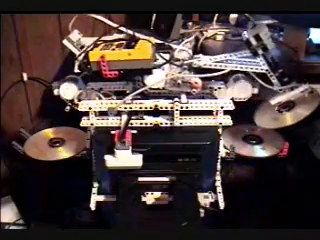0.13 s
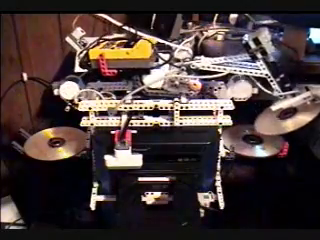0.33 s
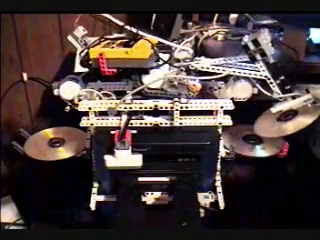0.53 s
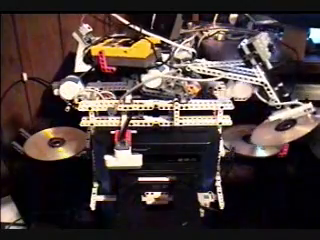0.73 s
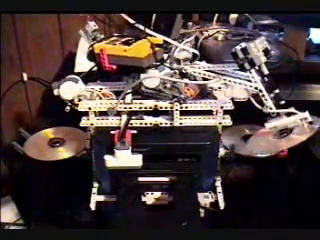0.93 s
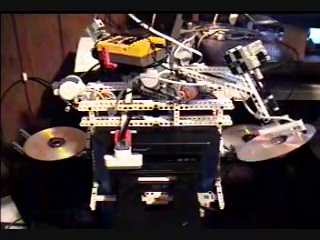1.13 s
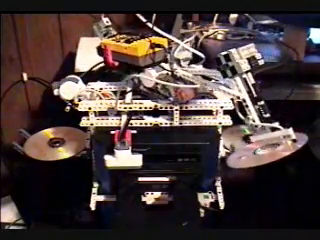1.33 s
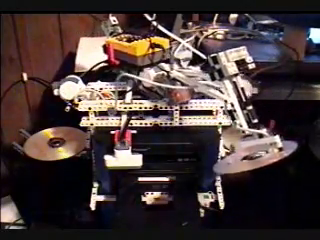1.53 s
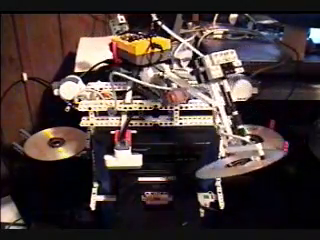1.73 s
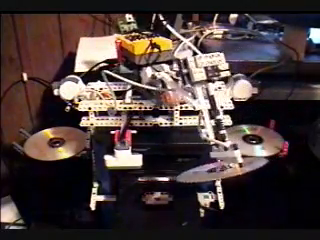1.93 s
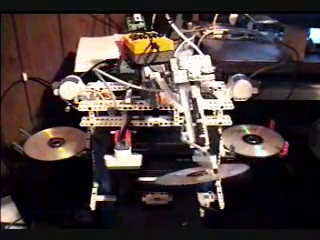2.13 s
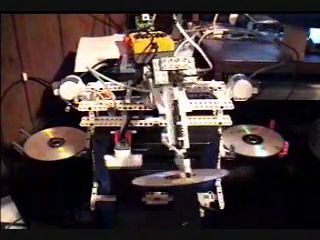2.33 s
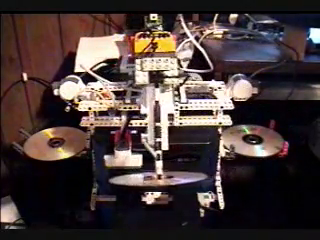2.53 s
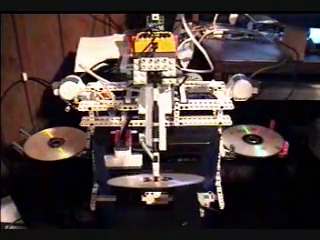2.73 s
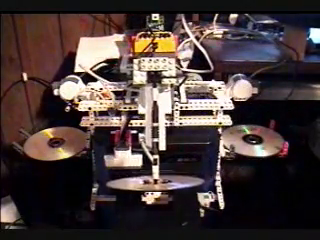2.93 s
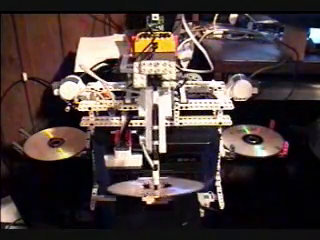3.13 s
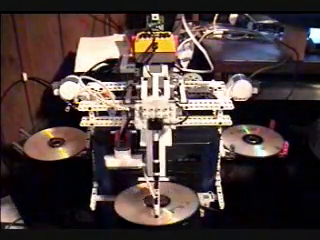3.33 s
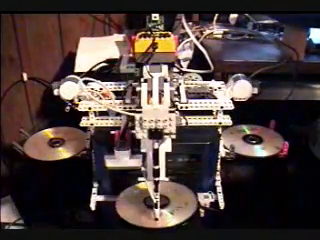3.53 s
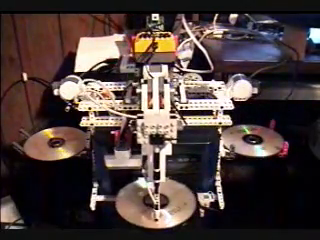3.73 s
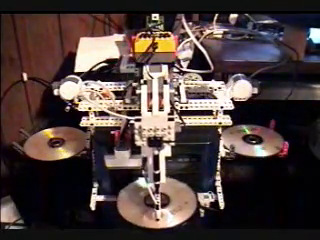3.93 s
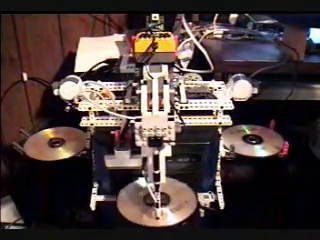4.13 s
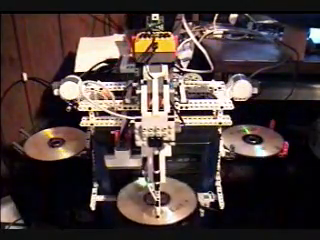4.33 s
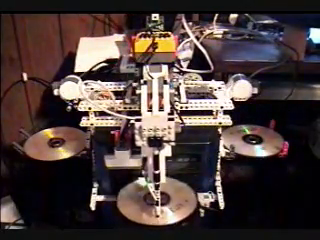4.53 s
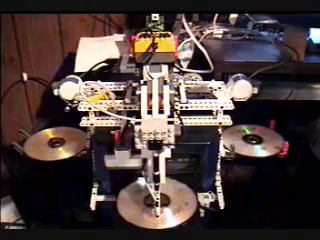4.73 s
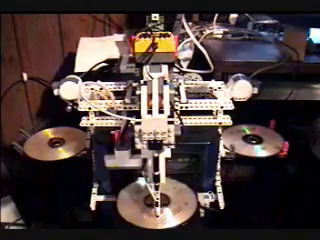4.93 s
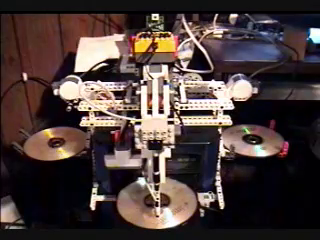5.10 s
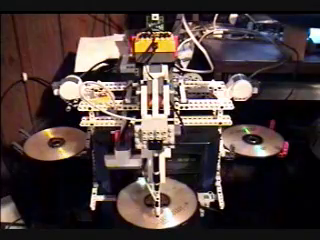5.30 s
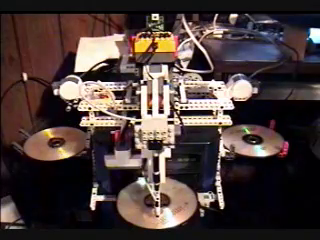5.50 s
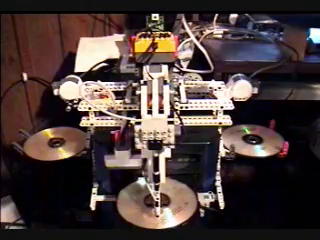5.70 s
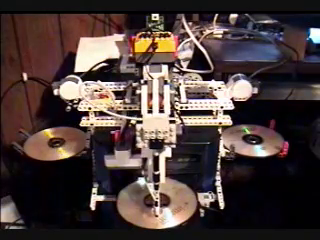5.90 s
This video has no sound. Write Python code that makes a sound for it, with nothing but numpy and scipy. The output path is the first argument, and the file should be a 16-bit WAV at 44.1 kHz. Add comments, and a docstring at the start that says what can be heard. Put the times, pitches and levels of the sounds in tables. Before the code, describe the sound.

A small geared motor whines and rattles for over two seconds, plastic clacks follow, then a second motor labours in three sagging turns over fan hum.

```python
"""Fans hum throughout: coloured noise plus unsteady tones. A home-built robot of plastic bricks carries a disc.
A geared motor swings the arm in one long whine: multiples of the shaft speed over a tooth rattle, then a coast-down.
The arm settles with small rattles, tips down through its resonances and clacks twice in decaying noise.
A second motor labours through three sagging turns; a few faint nudges follow.
The sound feeds the right channel, whose peaks may clip; the left has faint crosstalk and hiss."""
import sys
import numpy as np
from scipy import signal
from scipy.fft import rfft, irfft, next_fast_len
from scipy.io import wavfile
from scipy.ndimage import uniform_filter1d, map_coordinates

SR = 44100
rng = np.random.default_rng(int(sys.argv[2]) if len(sys.argv) > 2 else 0)


def master_out(mix):
    """Clip the mix to full scale and print it as 16-bit PCM to the path in sys.argv[1]."""
    frames = np.transpose(np.atleast_2d(mix))
    ceiling = np.clip(frames, -1, 1)
    pcm = np.round(ceiling * 32767).astype(np.int16)
    wavfile.write(sys.argv[1], SR, pcm)


N = 267246


def amp(db):
    """Decibels to gain."""
    return 10 ** (np.asarray(db) / 20)


def unit(x):
    """Scale to rms 1."""
    return x / np.sqrt(np.mean(x ** 2) + 1e-20)


def clock():
    """Seconds at each sample."""
    return np.arange(N) / SR


def along(points, hz):
    """Read (Hz, value) points on a log axis."""
    f, v = np.transpose(points)
    return np.interp(np.log(hz + 1), np.log(f + 1), v)


def curves(rows):
    """One value per sample for each column after the time."""
    s, *cols = np.transpose(rows)
    return [np.interp(clock(), s, c) for c in cols]


def wobble(rate):
    """A smooth random curve, rate knots a second."""
    knots = rng.standard_normal(int(N * rate / SR) + 4)
    return map_coordinates(knots, [clock() * rate], order=2)


def filtered(x, response):
    """x times a response of frequency."""
    m = next_fast_len(N + 8192)
    return irfft(rfft(x, m) * response(np.fft.rfftfreq(m, 1 / SR)), m)[..., :N]


def coloured(x, spectrum):
    """Shape x by (Hz, dB) points, falling away below the first; rms 1."""
    lowest_hz = spectrum[0][0]
    return unit(filtered(x, lambda hz: amp(along(spectrum, hz)) * np.minimum(hz / lowest_hz, 1) ** 2))


def angle(hz):
    """Running phase of a rate."""
    return 2 * np.pi * np.cumsum(hz * np.ones(N)) / SR


def fades(start, end, rise_db, fall_db):
    """Level in dB: 0 from start to end, with a rise before and a fall after, both in dB a second."""
    return -rise_db * np.maximum(start - clock(), 0) - fall_db * np.maximum(clock() - end, 0)


def bell(centre_s, sigma_s):
    """Gaussian pulse in time, peak 1."""
    return np.exp(-.5 * ((clock() - centre_s) / sigma_s) ** 2)


def lagging(x, lag_s):
    """x followed with a short delay, as by a mass."""
    keep = np.exp(-1 / (lag_s * SR))
    return x[0] + signal.lfilter([1 - keep], [1, -keep], x - x[0])


def ringing(resonances, hz):
    """Lift in dB of a tone that glides through (Hz, width Hz, dB) resonances."""
    return sum(lift / (1 + (2 * (hz - centre) / width) ** 2) for centre, width, lift in resonances)


def rattle(tooth_hz, spectrum, bite, uneven_db):
    """Noise pulsing at the tooth rate, of randomly varying strength, coloured by the plastic; rms 1."""
    strikes = np.exp(bite * np.cos(angle(tooth_hz))) * amp(uneven_db * wobble(450))
    return coloured(strikes * rng.standard_normal(N), spectrum)


def room(x, t60=0.22):
    """The short answer of a small furnished room: a decaying noise tail."""
    age = np.arange(SR // 3) / SR
    tail = rng.standard_normal(len(age)) * amp(-60 * age / t60) * (age > .003)
    return signal.fftconvolve(x, tail / np.linalg.norm(tail))[:N]


def fans():
    """Rushing air with slightly unsteady blade and mains tones."""
    # spectra of the rush and the low drone: pitch_hz, relative_db
    air_spectrum = [(180, -61), (300, -18.5), (344, -2.5), (379, -10), (459, -3.5), (712, -4.5),
                    (990, -8.5), (1070, -8.5), (2420, -15), (2970, -17), (4240, -18.5), (6400, -23.5),
                    (7970, -38.5), (10400, -71), (17500, -120)]
    bass_spectrum = [(25, -27), (80, -29.5), (120, -27), (170, -18), (210, -6.5), (245, 5), (300, -2),
                     (400, -39), (600, -76.5)]
    # blade and mains tones: pitch_hz, relative_db
    hum_tones = [(118.4, -68), (145.3, -69.5), (242.2, -47), (349.9, -43.5), (468.3, -50), (581.4, -45),
                 (640.6, -46), (732.1, -44.5), (1050, -47.5)]
    air = amp(-31.0 + 0.15 * wobble(4.2)) * coloured(rng.standard_normal(N), air_spectrum)
    drone = amp(-42) * coloured(rng.standard_normal(N), bass_spectrum)
    tones = sum(amp(db + 2 + 1.9 * wobble(6)) * np.sin(angle(hz) + 0.38 * wobble(7)) for hz, db in hum_tones)
    return air + drone + tones


def clacks():
    """The arm meets its stop and bounces; many loose bricks ring densely and briefly."""
    # plastic knocks: start_s, relative_db, t60_s
    knocks = [(3.631, -17, 0.11), (3.641, -39, 0.053), (3.651, -23, 0.072), (3.907, -26.5, 0.065),
              (3.921, -26, 0.054), (3.929, -22, 0.038)]
    # spectrum of the bricks: pitch_hz, relative_db
    brick_spectrum = [(300, -17), (1000, 4), (2000, 1.5), (3100, 2.5), (4000, 0.5), (5200, 5), (7000, -1.5),
                      (8000, -19)]
    attack_s = .0009
    blows = np.zeros(N)
    for s, db, t60 in knocks:
        age = np.maximum(clock() - s, 0)
        blows += (1 - np.exp(-age / attack_s)) * amp(db - 60 * age / t60)
    return blows * coloured(rng.standard_normal(N), brick_spectrum)


def arm():
    """Short nudges shake the slack gears; between them the arm tips down and its gears ring it."""
    # nudges of the gears: centre_s, relative_db, sigma_s
    nudge_times = [(2.768, -27.5, 0.031), (2.81, -39, 0.048), (2.929, -37, 0.022), (2.987, -31, 0.012),
                   (3.063, -42.5, 0.099), (3.62, -36, 0.025), (3.72, -37, 0.022), (3.812, -39, 0.012),
                   (4.017, -44, 0.099), (5.374, -35, 0.0051), (5.441, -35, 0.029), (5.946, -41, 0.061)]
    # spectrum of a nudge: pitch_hz, relative_db
    nudge_spectrum = [(800, -31), (1500, -1.5), (3000, -6), (4500, -1), (5800, 6), (6700, 4.5), (7400, -1),
                      (8000, -35)]
    # resonances of the long arm: centre_hz, width_hz, relative_db
    arm_modes = [(2050, 250, -6), (2640, 180, -3.5), (3010, 180, -2), (4030, 190, -1), (4650, 120, 2.5),
                 (5350, 350, -7), (5870, 240, -8.5), (6343, 230, -7), (7170, 220, -12.5)]
    tip_from_s, tip_to_s, tip_rise_db_per_s, tip_fall_db_per_s = 3.256, 3.33, 114, 200
    uneven = amp(1.5 * wobble(25))
    nudges = sum(amp(db) * bell(s, sigma_s) for s, db, sigma_s in nudge_times)
    tip_db = -26 + fades(tip_from_s, tip_to_s, tip_rise_db_per_s, tip_fall_db_per_s)
    teeth = rattle(420 * uneven, [(900, -5), (2000, -6.0), (8000, -0.5)], bite=0.67, uneven_db=2)

    def beam(f):
        """Sum of band-pass modes of alternating sign."""
        return sum((-1) ** k * amp(db) * 1j * f * w / (c * c - f * f + 1j * f * w)
                   for k, (c, w, db) in enumerate(arm_modes))

    tipping = amp(tip_db) * unit(filtered(teeth, beam))
    return nudges * rattle(600 * uneven, nudge_spectrum, bite=0.53, uneven_db=3) + tipping


def crank_drive(sag_shape=1.3):
    """Tooth rate, whine dB, rattle dB: each turn drags the motor down, then it races until the teeth bite again."""
    # turns: start_s, unloaded tooth rate at the start_hz, share of it lost at mid turn, relative_db
    turn_rows = [(4.371, 945.6, .41, 0), (4.719, 1035, 0.31, -0.2), (4.972, 1086, .46, -0.2)]
    off_s, off_hz, stop_db_per_s = 5.26, 788, 404
    # the teeth bite just before each turn starts; before the first the motor takes up the play
    bite_s, take_up_db, take_up_db_per_s = 0.0079, 8, 139
    # levels at the working tooth rate and their growth with speed
    work_hz, whine_work_db, rattle_work_db = 766.2, -24, -25
    whine_db_per_oct, rattle_db_per_oct = 5.5, 11
    # excess rate for full slack, and what it costs whine and rattle
    slack_hz, slack_whine_db, slack_rattle_db = 240, 11, 6

    starts, start_hz, sag, turn_db = np.transpose(turn_rows)
    edges = np.append(starts, off_s)
    turns = np.interp(clock(), edges, np.arange(len(edges)))
    which = np.minimum(turns.astype(int), len(starts) - 1)
    free_hz = np.interp(clock(), edges, np.append(start_hz, off_hz))
    tooth_hz = free_hz * (1 - sag[which] * np.abs(np.sin(np.pi * turns)) ** sag_shape)
    racing = (turns - which > .5) & (clock() < edges[which + 1] - bite_s)
    slack = np.clip((tooth_hz - work_hz) / slack_hz, 0, 1) * racing
    octaves = np.log2(tooth_hz / work_hz)
    drive_db = turn_db[which] - take_up_db * (clock() < starts[0] - bite_s)
    drive_db += fades(starts[0], off_s, take_up_db_per_s, stop_db_per_s)
    whine_db = whine_work_db + drive_db + whine_db_per_oct * octaves - slack_whine_db * slack
    rattle_db = rattle_work_db + drive_db + rattle_db_per_oct * octaves - slack_rattle_db * slack
    return tooth_hz, lagging(whine_db, lag_s=0.012), lagging(rattle_db, lag_s=.002)


def crank_motor():
    """The load rises and falls once a turn, so the whine sags and recovers three times."""
    # tones: multiple of the tooth rate, relative_db
    crank_orders = [(2, 0.5), (3, -0.5), (4, -0.5), (5, -10.5), (6, -13.5), (7, -10)]
    # response of the housing: pitch_hz, relative_db
    housing = [(1100, -21), (1500, -10.5), (1800, -5.5), (2000, -10), (2170, -2), (2420, -11), (2680, -2),
               (2920, 0.5), (3200, -14.5), (3620, -7), (3900, -16.5), (4400, 0), (5400, -6), (6400, 0)]
    # spectrum of the clatter: pitch_hz, relative_db
    clatter_spectrum = [(2500, -18.5), (3500, -7), (4000, -12), (4400, -4.5), (4750, -5), (5300, -4),
                        (5650, -7.5), (5980, 6.5), (6200, -0.5), (6450, 5), (6900, -7), (7400, -8),
                        (8000, -41.5)]
    grind_spectrum = [(1000, -15.5), (1700, 1.5), (2900, 1.0), (3900, -6.5), (6000, -33.5)]

    tooth_hz, whine_db, rattle_db = crank_drive()
    turn = angle(tooth_hz) + 0.09 * wobble(220)
    # each tone swells as it glides through a resonance of the housing, and flutters on its own
    gains = np.array([amp(db + along(housing, round(k) * tooth_hz)) for k, db in crank_orders])

    def fluttering_tone(order):
        flutter = unit(amp(1.6 * wobble(130)))
        return flutter * np.sin(order * turn + .3 * wobble(150) + rng.uniform(0, 2 * np.pi))

    tones = np.array([fluttering_tone(round(k)) for k, db in crank_orders])
    # dividing by a power of the total gain partly evens out the level
    whine = amp(1.0) * np.sum(gains * tones, axis=0) / np.linalg.norm(gains, axis=0) ** 0.23
    grind = rattle(tooth_hz, grind_spectrum, bite=.7, uneven_db=5.0)
    # the harder the teeth press, the louder and purer the whine; slack teeth grind more
    pure = np.clip((whine_db + 38.0) / 19, .5, .8)
    mesh = np.sqrt(2 * pure) * whine + amp(-2.5) * np.sqrt(1 - pure) * grind
    clatter = rattle(tooth_hz, clatter_spectrum, bite=0.59, uneven_db=0.5) * amp(1.0 * wobble(60))
    return amp(whine_db) * mesh + amp(rattle_db) * clatter


def swing_motor(weak_db=-49, lag_s=0.038):
    """Under load the teeth stay in mesh and sing; near free speed they float and rattle."""
    # shaft speed, smoothed below: time_s, speed_hz
    shaft = [(0.0, 89.8), (0.05, 102.1), (0.06, 103.5), (0.18, 107.7), (0.24, 112), (0.49, 114.2),
             (0.53, 112.1), (0.63, 104.2), (0.66, 105.0), (0.77, 113.5), (0.94, 106.8), (1.06, 110.1),
             (1.14, 107.5), (1.27, 109.6), (1.39, 106.4), (1.47, 108.7), (1.57, 106.3), (1.77, 108.8),
             (1.85, 104.4), (1.94, 104.5), (2.09, 108.1), (2.3, 105.6), (2.38, 106.4), (2.48, 103.6),
             (2.57, 107.2)]
    # tones of the loaded gears: multiple of the shaft speed, relative_db
    strong_orders = [(13, -44), (21, -40.0), (23, -39.9), (26, -43.1), (29, -44), (30, -37), (32, -37.8),
                     (33, -37.4), (34, -37.1), (37, -41), (39, -34.4), (40, -25.5), (41, -35.0),
                     (43, -29.2), (44, -35.4), (46, -34.5), (47, -31.5), (50, -29.9), (52, -33.5),
                     (53, -26.7), (54, -29.7), (55, -33.1), (56, -34.3), (57, -36.2), (58, -36.9),
                     (59, -36), (60, -29.6), (61, -31.9), (63, -30.3), (64, -36.9), (66, -39), (67, -35.6),
                     (70, -40.7)]
    # tones of the slack gears: multiple of the shaft speed, level against the gear train_db
    slack_orders = [(13, -24), (17, -21), (21, -20.5), (23, -20.5), (38, -14), (51, -6), (52, -12),
                    (55, -16.5)]
    # frame resonances the tones glide through: centre_hz, width_hz, lift_db
    frame_modes = [(3197, 20, 9.5), (3080, 1000, 0), (4250, 100, 1), (4840, 140, 7.5), (5215, 23, 7.5),
                   (5820, 96, 5.5), (6570, 45, 6.5)]
    # spectrum of the clatter: pitch_hz, relative_db
    clatter_spectrum = [(650, -37), (1100, -13), (1300, -28), (1600, -16), (1870, -11), (2030, -8.5),
                        (2210, -8), (3020, -12.5), (4430, -3.5), (5220, -4), (5720, 1.5), (7100, -2),
                        (7970, -19), (10400, -60), (17500, -120)]
    pinion_modes = [(2200, 280, 5.3)]  # centre_hz, width_hz, lift_db
    spin_up_s, spin_up_db_per_s, seat_s = 0.067, 30, 0.13
    off_s, coast_hz_per_s, coast_db_per_s, pinion_coast_db_per_s = 2.577, 680, 215, 79

    driven_hz, = curves(shaft)
    coasting_s = np.maximum(clock() - off_s, 0)
    speed_hz = np.maximum(uniform_filter1d(driven_hz, size=1200) - coast_hz_per_s * coasting_s, 20)
    # a shaft that is being slowed is loaded, one that is speeding up runs slack
    hz_per_s = np.clip(np.gradient(uniform_filter1d(speed_hz, size=2000)) * SR, -70, 70)
    load = 1 / (1 + np.exp(np.clip((speed_hz + lag_s * hz_per_s - 111) / 0.91, -30, 30)))
    # the gears only sing once the shaft is up to speed and the teeth are seated
    singing = (.02 + .98 * load) * np.clip((speed_hz - 96) / 8, .02, 1)
    singing *= np.minimum(clock() / seat_s, 1)

    # the whine swells in mid swing
    swell = bell(1.36, 0.51)
    gear_db = -18.5 + 1.5 * load + 0.9 * swell
    pinion_db = -31 + 1.5 * swell + ringing(pinion_modes, 20 * speed_hz) + 1.3 * wobble(14.01)
    turn = angle(speed_hz) + .006 * wobble(70) + .014 * wobble(14)

    # no two teeth are alike, so nearly every multiple of the shaft speed sounds at least faintly
    strong, gears, waver = dict(strong_orders), np.zeros(N), wobble(18)
    for order in np.setdiff1d(np.arange(11, 71), [20]):  # 20 is the pinion's
        db = strong.get(order, weak_db + rng.normal(0, 3.1))
        waver_db = 2.1 * np.roll(waver, rng.integers(N))
        gain = amp(db + ringing(frame_modes, order * speed_hz) + waver_db)
        gears += gain * np.sin(order * turn + rng.uniform(0, 2 * np.pi))
    gears /= np.sqrt(np.mean(gears[coasting_s == 0] ** 2))

    # the ten-tooth pinion sounds at its tooth rate mostly when slack, an octave above when loaded
    pinion = amp(pinion_db) * np.clip(load, .12, 1) * np.sin(20 * turn)
    pinion += amp(gear_db - 16.5) * (1.22 - load) * np.sin(10 * turn)
    clatter = rattle(10 * speed_hz, clatter_spectrum, bite=0.39, uneven_db=1.04)
    hushed = amp(-8 * singing)
    mesh = amp(-1.22) * np.sqrt(singing) * gears + amp(-0.28) * hushed * clatter
    floating = sum(amp(db + 2.5 * wobble(25)) * np.sin(round(k) * turn + wobble(60)) for k, db in slack_orders)
    gear_db += fades(spin_up_s, off_s, spin_up_db_per_s, coast_db_per_s)
    geared = amp(gear_db) * (mesh + (1 - load) * floating)
    return geared + amp(-pinion_coast_db_per_s * coasting_s) * pinion


def scene():
    """Everything reaches the right channel; the left has only crosstalk and faint hiss."""
    robot = swing_motor() + crank_motor() + arm() + clacks()
    sound = amp(6.0) * (robot + amp(-8.5) * room(robot) + fans())
    hiss = coloured(rng.standard_normal(N), [(25, 3.5), (200, -10.5), (1500, -9.5), (8000, -12.5)])
    return np.array([amp(-59.5) * sound + amp(-56) * hiss, sound])


def record(dry):
    """A narrow-band microphone stage, then clipping of the highest peaks and a final low-pass."""
    mic_top_hz, top_hz = 8050, 16000
    narrow = filtered(dry, lambda hz: 1 / np.sqrt(1 + (hz / mic_top_hz) ** 150))
    clipped = np.clip(narrow, -1, 1)
    return filtered(clipped, lambda hz: hz < top_hz)


dry = scene()
out = record(dry)
master_out(out)
```